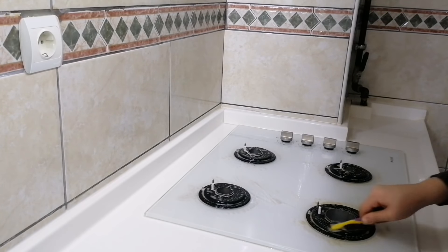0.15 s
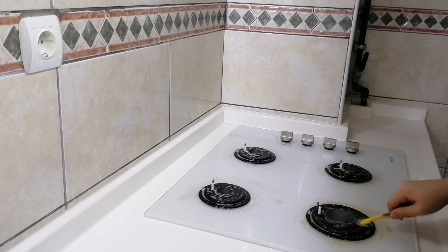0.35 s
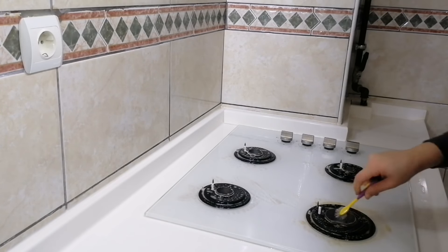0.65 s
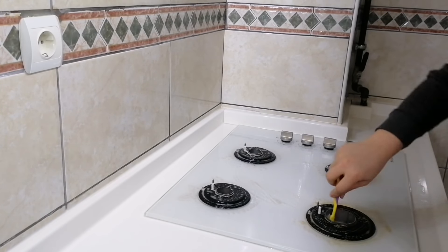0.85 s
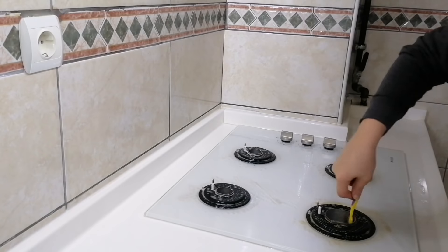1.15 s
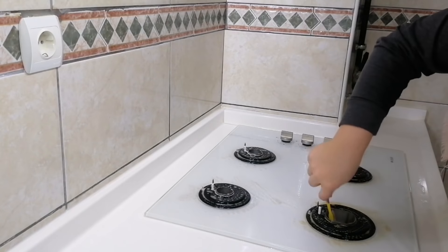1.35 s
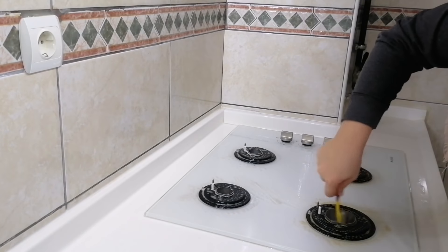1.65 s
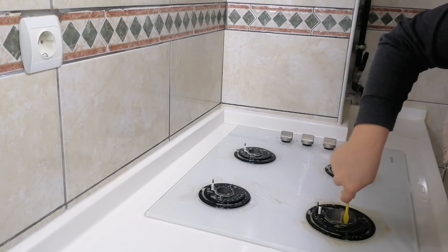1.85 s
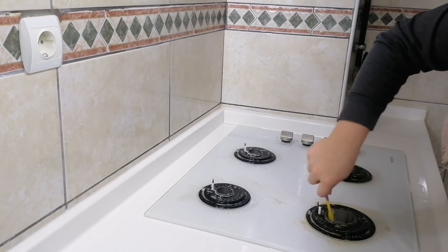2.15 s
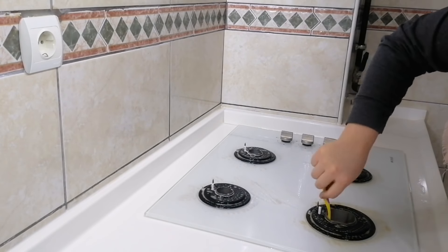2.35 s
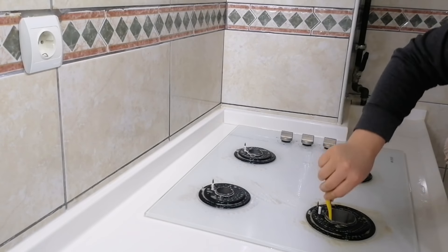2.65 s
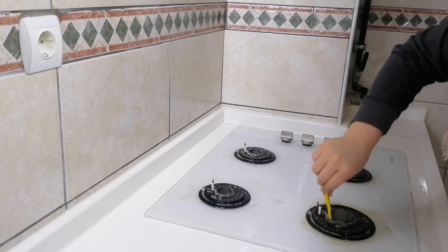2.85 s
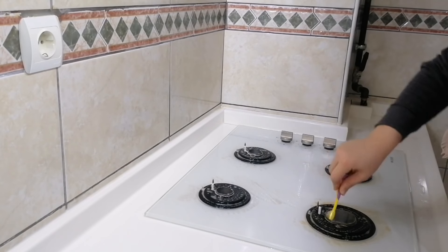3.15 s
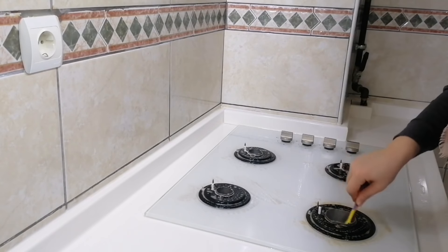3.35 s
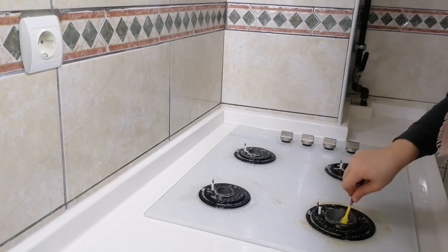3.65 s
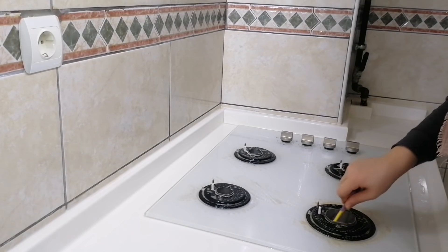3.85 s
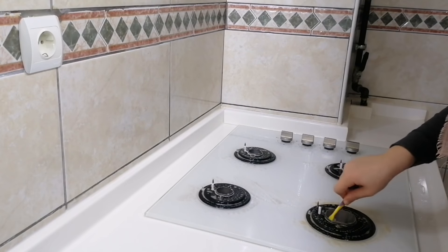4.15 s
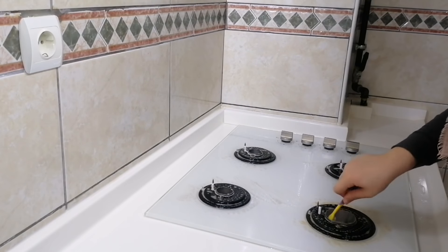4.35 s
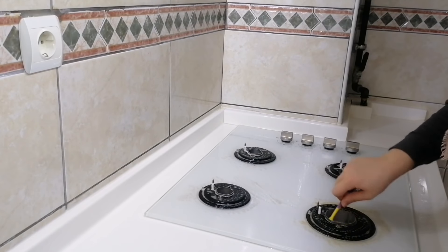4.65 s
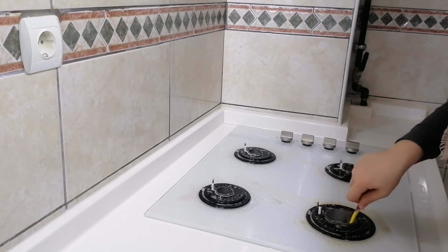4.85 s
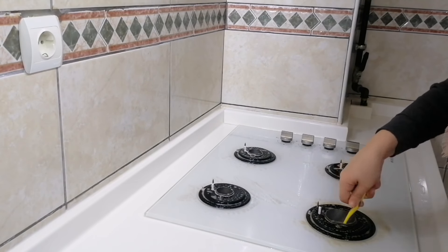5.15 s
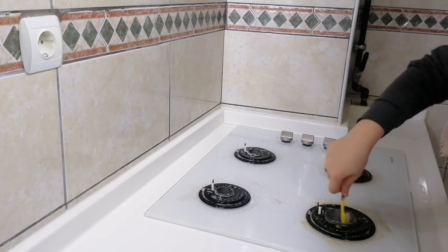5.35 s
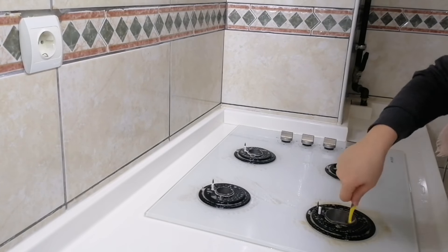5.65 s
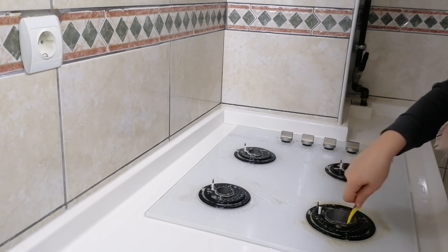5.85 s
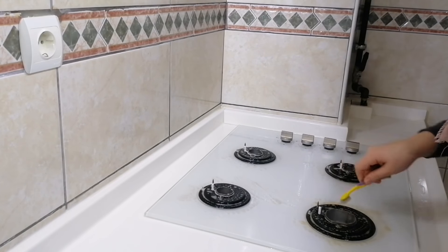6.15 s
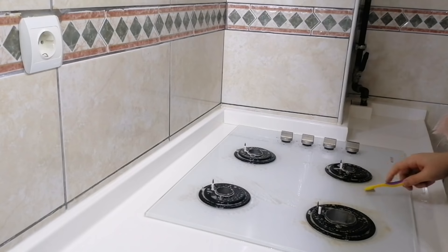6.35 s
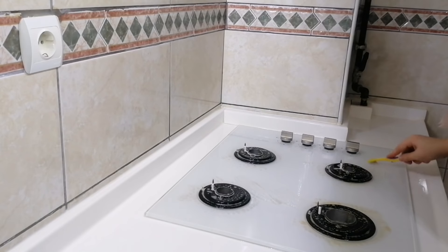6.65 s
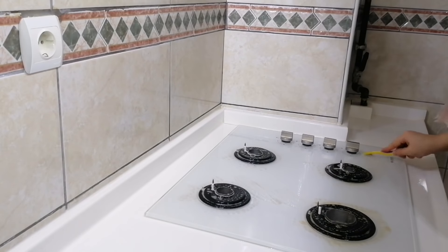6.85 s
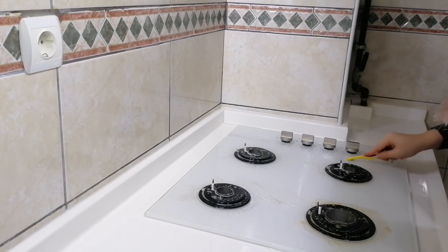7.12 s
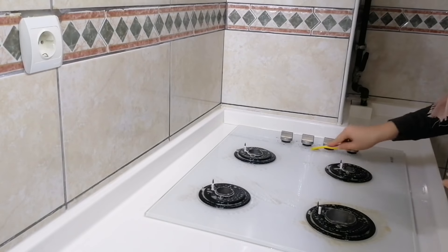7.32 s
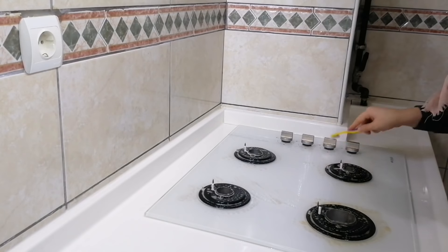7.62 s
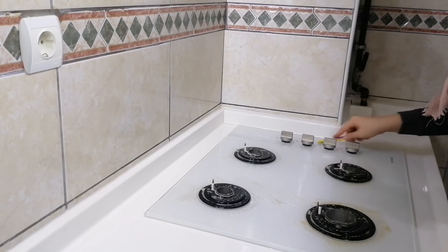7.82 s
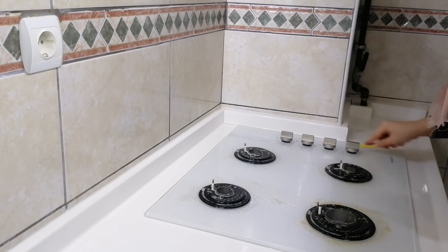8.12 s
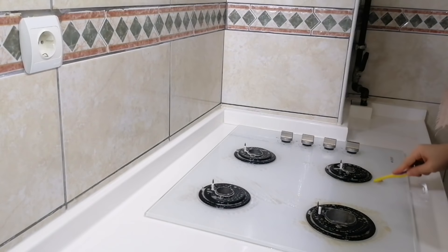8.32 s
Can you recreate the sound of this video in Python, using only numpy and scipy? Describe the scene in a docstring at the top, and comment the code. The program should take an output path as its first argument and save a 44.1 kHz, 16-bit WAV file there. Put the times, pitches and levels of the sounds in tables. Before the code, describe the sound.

Close by in a tiled kitchen, short hissing strokes of toothbrush bristles work around a stove burner, mixed with irregular plastic ticks, brief rubbing squeaks and dull thuds from the glass top. The scrubbing stays busy for most of the time, then eases off, leaving a few separate taps and a light metallic clink on the knobs. A low electrical hum and soft room noise continue underneath.

```python
"""Short, scratchy strokes of a toothbrush on the burner of a glass gas hob, close by in a tiled kitchen.
Stick-slip friction of the bristles makes dense tiny clicks that merge into a hiss, and the changing
pressure drives the glass plate to rumble in its modes. The plastic head rubs along edges and knocks on
burner, glass and, near the end, the metal knobs. Mains hum and soft room noise lie underneath, and
a phone with two microphone ports picks it all up."""
import sys
import numpy as np
from scipy import signal
from scipy.fft import rfft, irfft
from scipy.io import wavfile
from scipy.ndimage import uniform_filter1d

SR = 44100
rng = np.random.default_rng(int(sys.argv[2]) if len(sys.argv) > 2 else 0)


def master_out(mix):
    """Clip the mix to full scale and print it as 16-bit PCM to the path in sys.argv[1]."""
    frames = np.transpose(np.atleast_2d(mix))
    ceiling = np.clip(frames, -1, 1)
    pcm = np.round(ceiling * 32767).astype(np.int16)
    wavfile.write(sys.argv[1], SR, pcm)


N = 373968

# bending modes of the glass plate: (frequency [Hz], gain [dB], T60 [s])
PLATE_MODES = [(81.5, -3.5, 0.63), (136.6, -8, 1), (224, -11.5, 0.63), (240.9, -4, 0.22),
               (291.3, -9.5, 0.55), (319.5, -7, 0.033), (363.8, -8, 0.81), (478.6, -1, 0.23),
               (541, -11, 0.019), (591, -5.5, 0.21), (798, -6, 0.028), (757, -16, 1), (1013, -8.5, 0.094)]
# light contact between strokes and presses: (time [s], hiss level [dB], slow shake drive [dB])
LIGHT_CONTACT = [(.5, -69.5, -71), (.7, -91, -92), (.98, -71, -56), (1.1, -76, -59), (2.45, -68, -57),
                 (2.9, -83, -58), (3.3, -64.5, -62), (3.6, -98, -57.5), (4.0, -57, -50.5), (5.1, -72, -49),
                 (5.3, -72, -59), (6.1, -65, -57), (6.3, -99, -59), (6.55, -75, -88), (6.65, -73, -63),
                 (7.5, -70, -76), (7.7, -78.5, -79), (8.48, -69, -75)]


def undb(db):
    return 10 ** (np.asarray(db) / 20)


def level(x, db):
    return x * undb(db) / np.sqrt(np.mean(x ** 2))


def on_bins(table, n):
    """Log-frequency interpolation of (frequency [Hz], value) points onto an n-sample transform."""
    hz, value = np.transpose(table)
    return np.interp(np.log(np.arange(n // 2 + 1) * SR / n + 1), np.log(hz), value)


def colour(x, table):
    """Spectral shaping by (frequency [Hz], gain [dB]) points."""
    return irfft(rfft(x) * undb(on_bins(table, x.shape[-1])), x.shape[-1])


def band(x, lo_hz, hi_hz):
    return signal.sosfilt(signal.butter(2, [lo_hz, min(hi_hz, .45 * SR)], "band", fs=SR, output="sos"), x)


def whiten(x, bins):
    """Spectral whitening: every band of this many bins gets about the same energy."""
    spectrum = rfft(x)
    return irfft(spectrum / np.sqrt(uniform_filter1d(np.abs(spectrum) ** 2, bins, axis=1)), x.shape[1])


def ring(x, modes):
    """Modal superposition: x drives damped resonators, each of equal energy before its gain."""
    out = 0
    for k, (hz, db, t60) in enumerate(modes):
        r = np.exp(-np.log(1000) / (t60 * SR))
        w = 2 * np.pi * hz / SR
        mode = signal.lfilter([1], [1, -2 * r * np.cos(w), r * r], x)
        out = out + (-1) ** k * undb(db) * np.sin(w) * np.sqrt(1 - r) * mode
    return out


def drift(rate_hz):
    """Random modulation: values drawn at rate_hz, held and smoothed twice."""
    k = int(SR / rate_hz)
    steps = np.repeat(rng.standard_normal(N // k + 1), k)
    return uniform_filter1d(uniform_filter1d(steps, k), k)[:N]


def slips(spread_db):
    """Stick-slip friction: dense clicks of either sign, a few much larger than the rest."""
    return level(rng.standard_normal(N) * undb(spread_db * np.minimum(rng.exponential(size=N), 5)), 0)


def diffuse(n):
    """Diffuse field: noise at two points is partly coherent in the bass, hardly at all in the treble."""
    # left-right coherence: (frequency [Hz], correlation [ratio])
    coherence = [(60, 0.21), (130, 0.21), (290, 0.54), (640, 0.12), (1400, 0.0044), (15000, 0.0074)]
    c = np.clip(on_bins(coherence, n), 0, 1)
    mid, side = rfft(rng.standard_normal((2, n)))
    return irfft(np.sqrt((1 + c) / 2) * mid + np.sqrt((1 - c) / 2) * side * np.array([[1], [-1]]), n)


def hum_and_room_noise():
    """Noise floor: mains hum, slightly modulated in amplitude and phase, over a soft diffuse field."""
    # partials of the hum: (frequency [Hz], rms level [dB])
    partials = [(100, -44), (148, -65), (200, -70.5), (270, -74.5)]
    # spectrum of the room noise: (frequency [Hz], relative density [dB])
    noise_spectrum = [(15, -44), (25, -18), (43, -11.5), (68, -12), (104, -9), (126, -9.5), (152, -8.5),
                      (183, -19.5), (274, -14.5), (313, -23), (537, -22), (614, -21), (1020, -33),
                      (5140, -43), (15500, -70)]
    t = np.arange(N) / SR
    hum = 0
    for hz, db in partials:
        amplitude = np.sqrt(2) * undb(db + 1.14 * drift(16))
        hum += amplitude * np.sin(2 * np.pi * (hz * t + rng.random()) + .16 * drift(23))
    return hum + level(colour(diffuse(N), noise_spectrum), -57.5) * undb(.88 * drift(3.73))


def room_response(low_t60_s=.45, high_t60_s=.24, tail_db=1, near_db=-5):
    """Impulse response: near reflections off the hob, and a tail whose treble is absorbed first."""
    t = np.arange(SR // 2) / SR
    noise = diffuse(len(t))
    low = signal.sosfilt(signal.butter(1, 2500, fs=SR, output="sos"), noise)
    tail = low * undb(-60 * t / low_t60_s) + (noise - low) * undb(-60 * t / high_t60_s)
    tail = band(band(whiten(tail, bins=120), 400, 17000), 400, 17000)
    tail *= np.clip(t / .008, 0, 1) * np.clip((t[-1] - t) / .05, 0, 1)
    near = whiten(diffuse(len(t)) * np.exp(-t / .001), bins=300)
    near = band(near * (t < .01), 900, 14000)
    return sum(x * undb(db) / np.sqrt(np.sum(x ** 2) / 2) for x, db in ((tail, tail_db), (near, near_db)))


def tiled_room(direct, reflected, circling_hz=1.7, left_lag_samples=5):
    """Multipath propagation: sound arrives from the right; its echoes shift as the brush circles."""
    angle = 2 * np.pi * circling_hz * np.arange(N) / SR + 4 * drift(9)
    echoes = sum(signal.oaconvolve((reflected * share)[None], room_response(), axes=1)[:, :N]
                 for share in (np.cos(angle), np.sin(angle)))
    return echoes + np.array([np.roll(direct, left_lag_samples), direct])


def edge_rubs(rise_db_s=2500, fall_db_s=400):
    """Frictional self-excitation: as the head rubs along a burner edge, the cap sings in one resonance."""
    # rubs: (time [s], hold [s], level [dB], frequency [Hz], upper band edge over centre [ratio])
    rubs = [(1.583, 0.026, -55, 4350, 1.03), (1.645, 0.083, -60, 4420, 0.81), (1.96, 0.027, -53, 870, 0.99),
            (2.09, 0.023, -56, 898, 0.89), (2.83, .085, -47, 600, 1.1), (2.84, .06, -48, 479, 1.03),
            (4.724, .09, -44.5, 478, 1.04), (5.016, .045, -45.5, 476, 1.05),
            (3.5, 0.014, -56.5, 4130, 1.08), (3.961, 0.022, -45, 1430, 1.28),
            (5.024, 0.042, -41, 338, 1.05), (5.778, 0.054, -55, 3920, 0.75)]
    out, t = np.zeros(N), np.arange(N) / SR
    friction = slips(spread_db=3)
    for start, hold, db, hz, ratio in rubs:
        at = slice(int(start * SR) - SR // 20, int((start + hold) * SR) + SR // 5)
        fade_db = rise_db_s * np.maximum(start - t[at], 0) + fall_db_s * np.maximum(t[at] - start - hold, 0)
        ratio = max(ratio, 1.01)
        tone = band(friction[at], hz / ratio, hz * ratio)
        # the slips lock on to the resonance, which keeps its strength steady
        tone /= np.sqrt(uniform_filter1d(tone ** 2, size=700) + 1e-9)
        out[at] += tone * undb(db - fade_db)
    return out


def head_knocks(rise_s=.0003, decay_s=.0011, knobs_from_s=7):
    """Impact excitation: the plastic head cracks and bounces, rings the metal and thuds on the plate."""
    # impacts: (time [s], click drive [dB], click centre [Hz], treble over click [dB],
    # metal drive over click [dB], thud drive [dB], thud centre [Hz])
    impacts = [(0.329, -52, 2500, -9, -1, -76, 172), (0.9142, -57.5, 2000, -12, -10, -67, 226),
               (1.026, -55.5, 2030, 0, 12, -47, 205), (1.16, -48, 2750, 6, 6, -32, 970),
               (1.1908, -36, 4740, -2, 2, -36.5, 417), (1.3711, -29, 4200, -12, 1, -33, 1140),
               (1.6483, -55, 4400, 15.5, 9, -66, 170), (1.8414, -33, 4150, -2.5, 7, -46, 1500),
               (1.847, -38.5, 1840, -8, -11, -52, 940), (1.9619, -42, 4400, 6, -2, -40, 840),
               (2.0704, -48, 4300, -5, 13.5, -66, 900), (2.224, -31.5, 4500, -5, 9, -49, 1900),
               (2.2296, -35, 4440, -6, -5, -58, 365), (2.3, -52, 4700, 15, -10, -73, 213),
               (2.5607, -48, 1690, 3.5, -11, -43, 237), (2.8172, -47.5, 1110, -17, -12, -37, 604),
               (2.933, -40.5, 2110, -3.5, -8, -44.5, 490), (3.3257, -44.5, 3050, -8, 7, -67, 280),
               (3.3913, -49, 1470, 2, -9, -47, 503), (3.6232, -54, 1200, -33, -3, -48, 794),
               (3.6464, -47, 1590, -6, -5, -48, 704), (3.6615, -50, 1700, -7, 4, -54, 700),
               (3.7369, -45.5, 1950, -3, -9, -41, 490), (3.8623, -37, 3850, -33, 12, -39.5, 544),
               (3.9995, -42.5, 1400, 4, -9, -38.5, 740), (4.1147, -40, 1920, 1, -6, -48, 800),
               (4.1201, -38.5, 2080, -2, -6, -37, 800), (4.2537, -45.5, 4400, 8, 4, -40, 370),
               (4.3595, -43, 1940, -6, 3, -66, 233), (4.4808, -43.5, 1840, 0, 8.5, -39, 470),
               (4.5955, -39, 1900, -1, 9, -54, 616), (4.7213, -51.5, 1830, -16, 15.5, -35, 448),
               (4.8812, -47.5, 1650, -31, 13, -37, 850), (4.9934, -37.5, 1460, -1, -8, -39.5, 600),
               (5.0158, -44, 1010, -11, -7, -31.5, 764), (5.1054, -43.5, 2610, 8, -8, -38, 327),
               (5.132, -40, 1690, -25, -24, -43, 480), (5.4812, -50.5, 4250, 8.5, 11, -62, 480),
               (5.67, -58, 1960, -22, 0, -40, 313), (5.7294, -36, 2340, 0, -14, -44, 297),
               (5.7821, -32, 3970, -10, 8.5, -51, 476), (5.8717, -43.5, 1810, -31, -19, -52, 484),
               (5.9224, -37.5, 6860, 6.5, -27, -47, 463), (6.094, -28.5, 4340, -29, 6, -36, 536),
               (6.438, -71, 1530, -15, -6, -65, 396), (6.653, -38, 2130, -22, -21, -58, 390),
               (6.6546, -34.5, 2060, -22, -23, -67, 390), (7.1823, -46.5, 2480, -1.5, 1.5, -37, 208),
               (7.8687, -52.5, 1390, -12, 0, -58, 600), (7.8694, -52.5, 2550, -18, -6, -65, 172),
               (8.2788, -40, 2100, 4.5, 4, -49, 221), (8.2815, -34.5, 2010, -2, 3.5, -49, 221),
               (8.2945, -37, 2150, -26, 3.5, -48.5, 306)]
    # modes of the metal burner and of a knob: (frequency [Hz], gain [dB], T60 [s])
    burner_modes = [(1370, 1, 0.0094), (1865, 0, 0.038), (2410, -16, 0.12), (2630, -27, 0.1),
                    (4200, 0, 0.024), (4470, -3.5, 0.055), (5630, -18, 0.019), (7600, 2.5, 0.012)]
    knob_modes = [(1340, 1, 0.19), (1390, -4, 0.23), (2120, 4.5, 0.068), (2157, 2.5, 0.16),
                  (2243, 6.5, 0.25), (2320, -1, 0.071), (2990, -15, 0.045), (4300, 0, 0.044),
                  (4780, 5, 0.03), (5130, 3, 0.078), (5170, 0, 0.058), (5400, 2, 0.029)]
    crack, burner, knob, push = np.zeros((4, N + SR))
    t = np.arange(SR // 20) / SR
    touch = np.minimum(t / rise_s, 1) * np.exp(-t / decay_s) + .22 * np.exp(-t / .0038)
    for start, click_db, hz, treble_db, metal_db, thud_db, thud_hz in impacts:
        at = slice(int(start * SR), int(start * SR) + len(t))
        noise = rng.standard_normal((2, len(t)))
        noise = np.sign(noise) * (1 + np.abs(noise)) / 2  # firm contact without gaps
        bounce_s = rng.uniform(.0038, .016)
        bounce = .5 * (t > bounce_s) * np.exp(-np.abs(t - bounce_s) / .0004)
        burst = whiten(noise * (touch + bounce), bins=30) * (t < .03)
        edges_hz = hz / 1.51, hz * 1.42
        body = band(band(burst[0], *edges_hz), *edges_hz)
        treble = band(burst[1], 3050, 7400)
        hit = undb(click_db) * (body / np.abs(body).max() + undb(treble_db) * treble / np.abs(treble).max())
        crack[at] += hit
        struck = knob if start > knobs_from_s else burner
        struck[at] += undb(metal_db) * hit * np.exp(-t / .0032)
        # a softer contact pushes longer and so reaches the lower modes
        thud = band(np.exp(-t / .0004), thud_hz / 1.35, thud_hz * 1.35)
        push[at] += undb(thud_db) * thud / np.abs(thud).max()
    metal = ring(burner, burner_modes) + ring(knob, knob_modes)
    return (undb(9.5) * crack + metal + undb(-3.5) * ring(push, PLATE_MODES) + undb(-4.5) * push)[:N]


def envelopes(gestures, rest_db, rest_offset_db, rise_db_s, fall_db_s):
    """Incoherent addition: gestures and light contact sum in power; gains of a main and an offset layer."""
    t = np.arange(0, N, 32) / SR
    start, hold, db, offset_db = np.transpose(gestures)[:, :, None]
    fade_db = rise_db_s * np.maximum(start - t, 0) + fall_db_s * np.maximum(t - start - hold, 0)
    power = undb(2 * (db - fade_db))
    rest = undb(2 * np.interp(t, np.transpose(LIGHT_CONTACT)[0], rest_db))
    main = power.sum(axis=0) + rest
    offset = (power * undb(2 * offset_db)).sum(axis=0) + rest * undb(2 * rest_offset_db)
    return [undb(np.interp(np.arange(N) / SR, t, 10 * np.log10(p))) for p in (main, offset)]


def plate_rumble():
    """Forced vibration: uneven pressure shakes the glass plate, and its modes ring on afterwards."""
    # presses of the head: (time [s], hold [s], slow shake drive [dB], quick shake over slow [dB])
    presses = [(0.0, 0.024, -54.5, -0.5), (1.045, 0.047, -45, -9), (1.102, 0.039, -51, -6),
               (1.184, 0.047, -44, -6), (1.349, 0.044, -62, -9), (1.441, 0.046, -47.5, -11),
               (1.568, 0.026, -55.5, -20), (1.773, 0.02, -47, -11), (1.86, 0.033, -47.5, -9.5),
               (1.963, 0.043, -46, -10), (2.072, 0.036, -53, 2.5), (2.222, 0.042, -61, -20),
               (2.389, 0.029, -49.5, -19), (2.549, 0.061, -52, -0.5), (2.82, 0.076, -41, -11),
               (2.923, 0.078, -46.5, -18), (3.392, 0.068, -45.5, -6.5), (3.714, 0.023, -43, -7.5),
               (3.861, 0.025, -46.5, -7), (3.995, 0.044, -46.5, -13), (4.1, 0.048, -55, -30),
               (4.222, 0.032, -47, -26), (4.476, 0.11, -45.5, -8.5), (4.572, 0.022, -50, -13),
               (4.725, 0.064, -42.5, -9.5), (4.888, 0.028, -48, 4.5), (4.941, 0.031, -59, -13),
               (5.018, 0.034, -37.5, -13), (5.102, 0.091, -42.5, -9), (5.452, 0.066, -47.5, -3.5),
               (5.522, 0.081, -43, -7), (5.642, 0.05, -44, -3.5), (5.744, 0.068, -39.5, -28),
               (5.862, 0.066, -39.5, -11.5), (5.991, 0.025, -55, -1), (6.092, 0.047, -42.5, 1.5),
               (6.183, 0.014, -52, 4), (7.185, 0.038, -49, -13), (8.28, 0.11, -54.5, -10)]
    _, _, rest_db = np.transpose(LIGHT_CONTACT)
    slow, quick = envelopes(presses, rest_db, rest_offset_db=-9.5, rise_db_s=1396, fall_db_s=375)
    friction = slips(spread_db=3.5) * undb(1.5 * drift(25))
    shake = slow * level(band(friction, 45, 429), 0) + quick * level(band(friction, 747, 940), 0)
    return undb(-17.5) * ring(shake, PLATE_MODES) + undb(-2.5) * shake


def bristle_strokes():
    """Friction noise: countless slips of the bristle tips hiss while the head drags in a lower band."""
    # strokes: (time [s], hold [s], hiss level [dB], drag over hiss [dB])
    strokes = [(0.0, 0.0086, -48.5, -14), (0.095, 0.042, -56.5, -7), (0.274, 0.064, -55, -8.5),
               (0.419, 0.0084, -53.5, -18), (0.47, 0.054, -65, -4), (0.923, 0.0065, -67.5, 6),
               (1.053, 0.016, -45, -5.5), (1.088, 0.011, -54, 4.5), (1.185, 0.0036, -48.5, 3.5),
               (1.367, 0.011, -42.5, -4.5), (1.42, 0.021, -51.5, 2.5), (1.596, 0.0098, -47.5, -4.5),
               (1.649, 0.012, -48, -6.5), (1.7, 0.039, -55.5, -7.5), (1.823, 0.003, -42, -9),
               (1.84, 0.0054, -54, 6), (1.956, 0.018, -53, 0), (2.08, 0.021, -46.5, -6),
               (2.208, 0.013, -46, -20), (2.228, 0.0047, -51, 9.5), (2.287, 0.043, -50.5, -7.5),
               (2.515, 0.0049, -51, -3.5), (2.559, 0.021, -47.5, -8), (2.684, 0.0097, -55.5, 0),
               (2.784, 0.018, -47.5, -8), (2.854, 0.011, -51.5, -7), (2.918, 0.053, -59, 4),
               (3.023, 0.031, -54.5, -3), (3.145, 0.077, -50, -9.5), (3.322, 0.017, -58, -4),
               (3.425, 0.096, -53, 0), (3.649, 0.0096, -56, 1.5), (3.729, 0.0041, -48.5, -2),
               (3.853, 0.013, -58.5, -2), (3.996, 0.013, -56, 0), (4.116, 0.0025, -48, 1),
               (4.247, 0.01, -61.5, 9), (4.338, 0.049, -59, -4), (4.47, 0.013, -48.5, -5),
               (4.592, 0.0025, -48.5, 2), (4.722, 0.011, -55.5, 5), (4.777, 0.016, -51, -6),
               (4.81, 0.071, -56, 3), (4.881, 0.021, -46.5, 2.5), (4.986, 0.03, -53, 2.5),
               (5.101, 0.0069, -56, -3), (5.298, 0.0076, -58, -2.5), (5.375, 0.028, -49, -12.5),
               (5.42, 0.049, -50.5, -10), (5.475, 0.013, -55, -17), (5.502, 0.026, -46, -6),
               (5.65, 0.004, -44, -5), (5.72, 0.0057, -45, -12), (5.769, 0.0092, -53.5, 5),
               (5.913, 0.015, -53.5, -2), (5.96, 0.15, -56, -3.5), (6.089, 0.0065, -42, -13),
               (6.13, 0.023, -58.5, 7), (6.647, 0.047, -60.5, 3.5), (6.844, 0.012, -67, -14),
               (7.241, 0.12, -63.5, -8), (7.777, 0.0073, -71, -12)]
    # spectrum of the slipping tips: (frequency [Hz], relative density [dB])
    tip_spectrum = [(1290, -7), (2200, -18.5), (3230, -5), (4300, 0.5), (5270, -3.5), (6850, -1.5),
                    (8540, -7), (11000, -5.5), (13500, -14.5), (15500, -21)]
    _, rest_db, _ = np.transpose(LIGHT_CONTACT)
    hiss, drag = envelopes(strokes, rest_db, rest_offset_db=-5, rise_db_s=565, fall_db_s=400)
    tips = slips(spread_db=4.2) * undb(4.5 * drift(28))
    head = slips(spread_db=4.8) * undb(2.5 * drift(60))
    return hiss * level(colour(tips, tip_spectrum), 0) + drag * level(band(head, 1450, 2810), 0)


def scene():
    """Superposition: scrubbing and knocks over the noise floor; the knocks excite the room less."""
    scrubbing = bristle_strokes() + plate_rumble()
    knocks = head_knocks()
    scrubbing += edge_rubs()
    return tiled_room(scrubbing + knocks, reflected=scrubbing + undb(-4) * knocks) + hum_and_room_noise()


def record(dry):
    """Frequency response: the two ports differ in sensitivity by band, and a steep low-pass cuts the top."""
    # imbalance of the ports: (frequency [Hz], left over right [dB])
    imbalance = [(40, -5.7), (100, -5.8), (250, -1.5), (1000, -2.1), (4000, -2.9), (8000, 1.2),
                 (13000, 2.9)]
    tilt_db = on_bins(imbalance, N) / 2
    ports = irfft(rfft(dry) * undb([tilt_db, -tilt_db]), N)
    return signal.sosfilt(signal.ellip(10, .2, 70, 15300, fs=SR, output="sos"), ports)


dry = scene()
out = record(dry)
master_out(out)
```